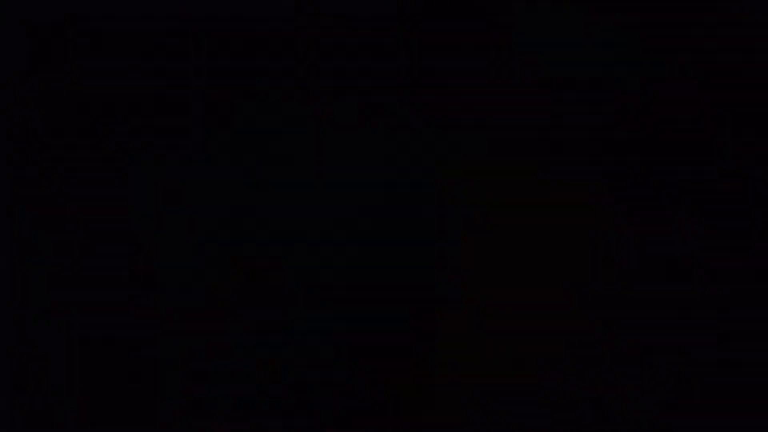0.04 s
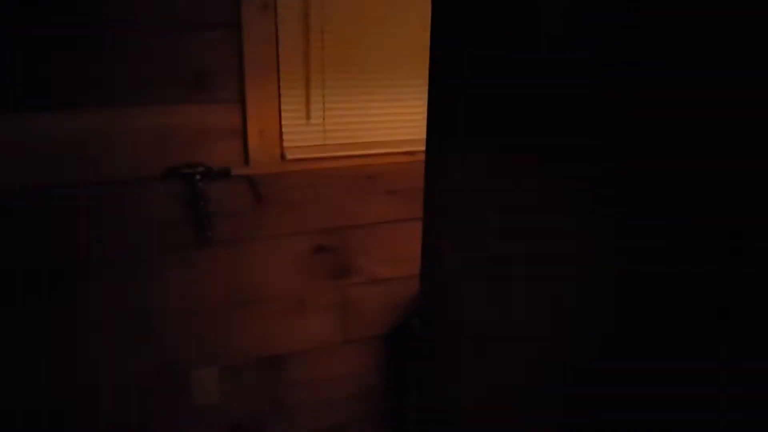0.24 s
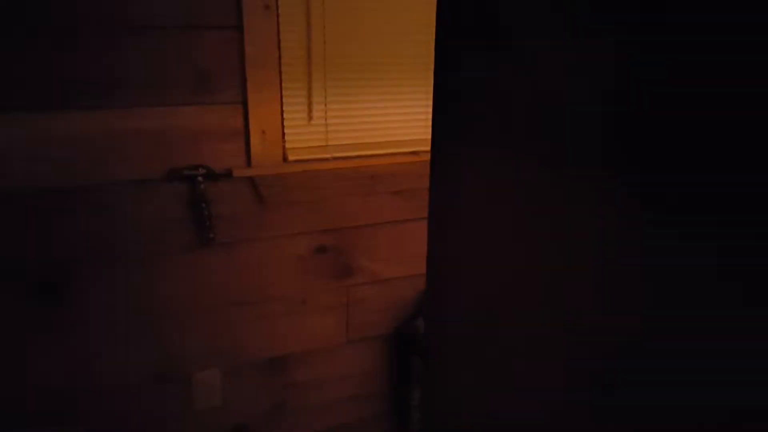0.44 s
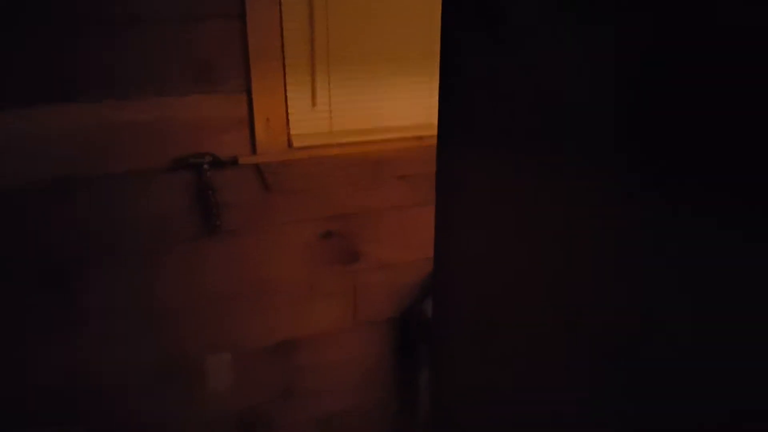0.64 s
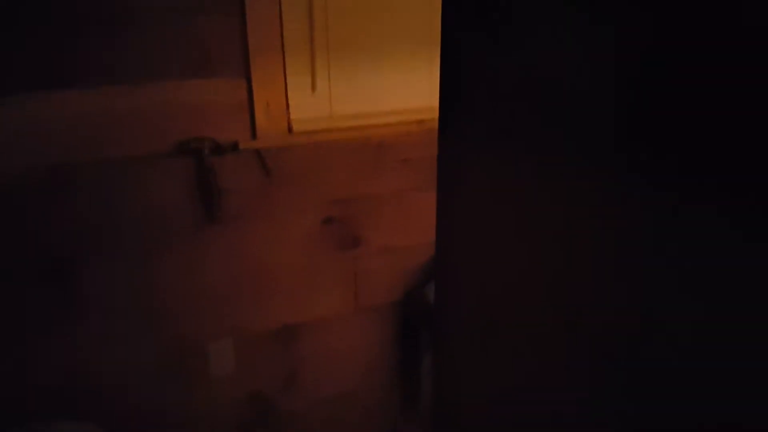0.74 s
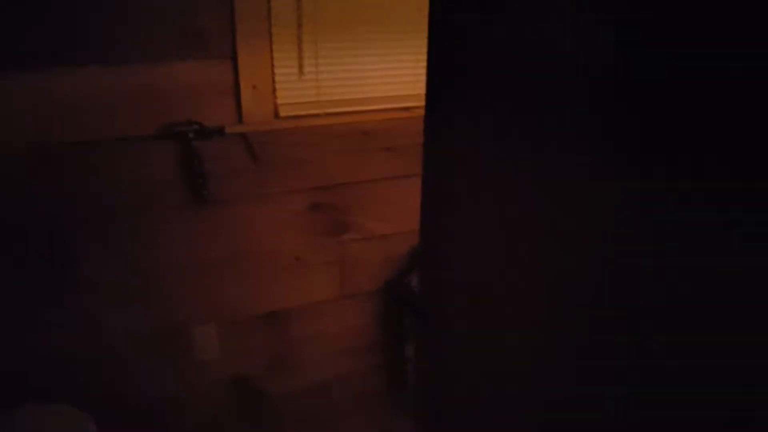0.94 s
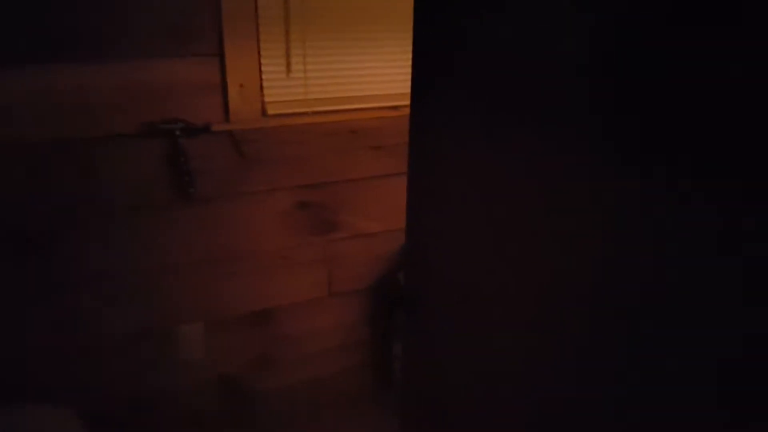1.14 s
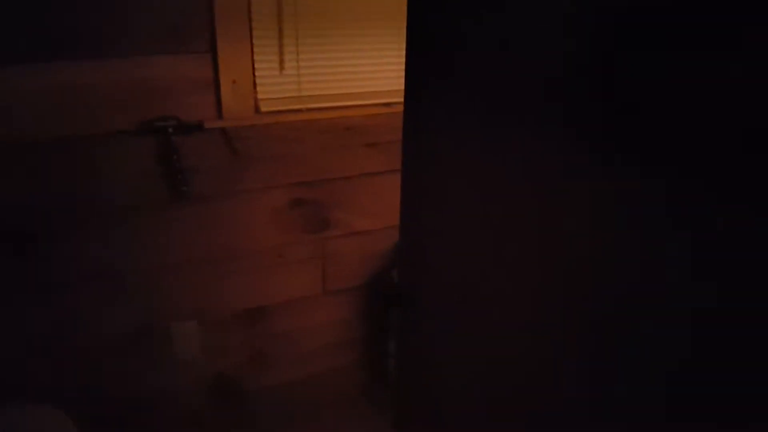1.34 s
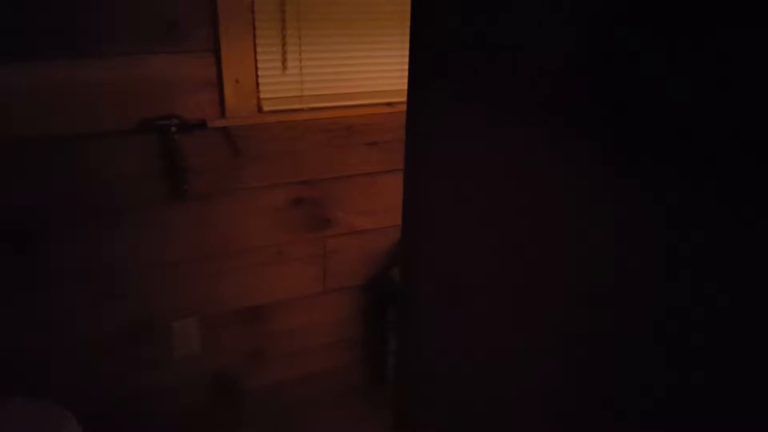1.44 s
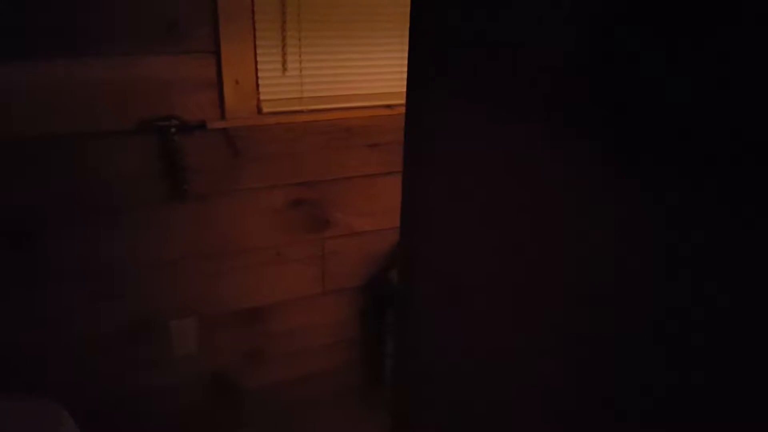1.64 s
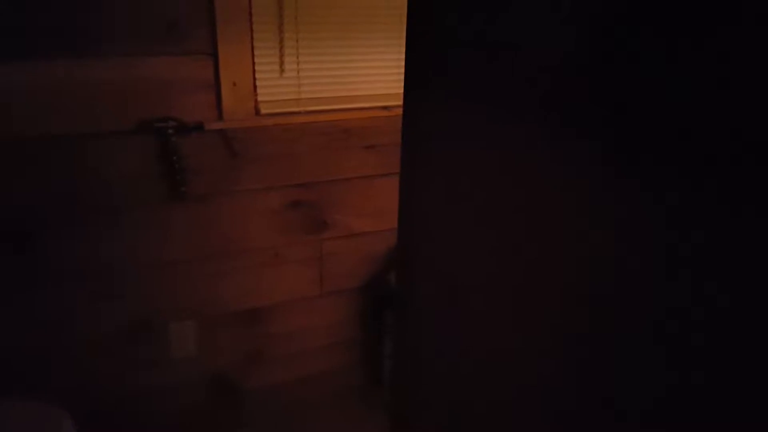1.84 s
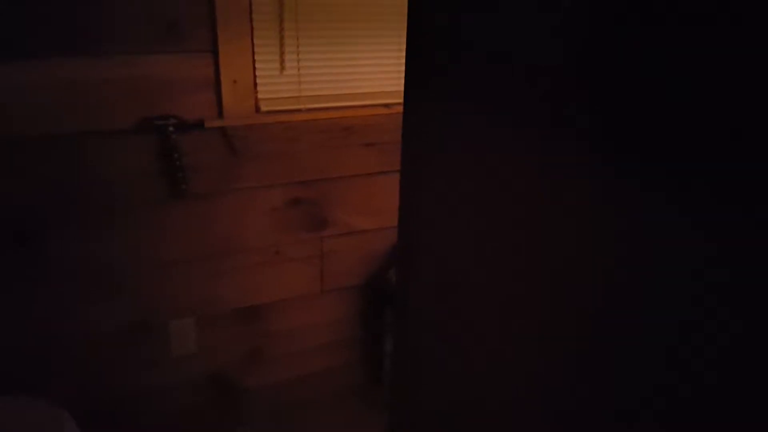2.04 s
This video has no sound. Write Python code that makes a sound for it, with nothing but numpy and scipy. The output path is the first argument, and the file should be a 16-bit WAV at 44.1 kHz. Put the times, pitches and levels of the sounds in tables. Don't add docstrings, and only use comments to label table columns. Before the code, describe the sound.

Four hard shoe steps click and knock on wooden boards, with short room echo and faint hum

```python
import sys
import numpy as np
from scipy import signal
from scipy.fft import rfft, irfft
from scipy.io import wavfile
from scipy.ndimage import uniform_filter1d

SR = 44100
rng = np.random.default_rng(int(sys.argv[2]) if len(sys.argv) > 2 else 0)


def voltage_ratio(level):
    return 10 ** (np.asarray(level, float) / 20)


def materialize(psi):
    bounded = np.clip(np.atleast_2d(psi).T, -1, 1)
    quanta = np.round(bounded * 32767).astype(np.int16)
    wavfile.write(sys.argv[1], SR, quanta)


N = 91331
LENGTH = 1 << 14
T = np.arange(LENGTH) / SR
F = np.fft.rfftfreq(LENGTH, 1 / SR)

# f/Hz, level/dB
HUSH_COLOUR = [(25, -11.5), (70, 0), (200, -2), (650, -16.5), (2000, -21.5), (3700, -29), (4900, -29),
               (8000, -38.5), (15000, -37.5)]
HUSH_SIDE_COLOUR = [(25, -16), (200, -7.5), (600, -10.5), (2000, -15.5), (5000, -23.5), (9500, -32),
                    (15000, -28)]
# t/s, level/dB
STIR = [
    (0, 4.5),
    (.35, -4),
    (.5, -4.5),
    (.72, -1.5),
    (.85, 4.5),
    (1.1, -1.5),
    (1.6, 2),
    (2.07, 1.5),
]
HUSH_DB, HUSH_SIDE_DB, SWELL_TOP_HZ = -62, -69, 930
# t/s, level/dB
HUM_SWELL = [
    (0.0, -91),
    (0.79, -96),
    (0.87, -59.5),
    (1.18, -115),
    (1.34, -53),
    (1.53, -74.5),
    (1.87, -56),
    (2.07, -55),
]
HUM_HZ, HUM_WIDTH_HZ = 116.6, 8.6

# t/s, level/dB, f/Hz, ring/s
TAPS = [(.0185, -43, 780, 0.015), (.0200, -51.5, 350, 0.064), (0.033, -45, 362, 0.044),
        (0.044, -46, 272, 0.069), (0.059, -50, 297, 0.027), (.085, -59, 303, 0.098),
        (.6230, -52, 520, .025), (.6720, -52, 350, .06), (.9194, -45, 330, .05), (.9194, -51, 850, .018),
        (2.034, -58, 228, 0.14), (1.965, -60, 470, 0.092), (1.7076, -62, 247, 0.12),
        (1.7737, -54, 243, 0.036)]
TAP_RISE_S, TAP_WET_DB = 0.00056, -11.5

# f/Hz, t60/s
CABIN_T60 = [(100, 0.36), (250, 0.24), (500, 0.3434), (1100, 0.33), (2000, 0.2539), (3700, 0.2267),
             (7700, 0.23), (15000, 0.1645)]
# f/Hz, level/dB
CABIN_COLOUR = [(100, -4.5), (250, -7.5), (500, -9), (1100, -12), (2000, -13.5), (3700, -16), (7700, -21.5),
                (15000, -19)]
CABIN_RISE_S, CABIN_ALIKE_HZ = 0.00084, 350
EARLY_DB, EARLY_S = -1.5, 0.015
WET_DB = [-3, 0, -0.5, -2, 2.5]
# f/Hz, level/dB
SHADE = [(200, -3), (1000, -2), (2000, -10), (3000, -3.5), (8000, -40), (12000, -25), (15000, -17)]
LEFT_LAG_S = .0003

# t/s, level/dB, plank (rounded), grit length/s, brightness/(dB per octave)
TICKS = [(.1445, -26, 3, 0.0035, 1.5), (.1490, -28.5, 3, 0.0026, -6), (.1540, -31, 2.5, 0.0036, -6.5),
         (.1590, -32, 3, 0.0022, -5), (.1810, -40.5, 2.5, .003, -8), (.2030, -17, 0, .0008, 2.5),
         (.2045, -25, 0.5, 0.00084, -1), (.7370, -38, 4, .0015, 2.5), (.7400, -38.5, 4, 0.0026, -2.5),
         (.7520, -53, 4, 0.0056, -8), (0.765, -46, 4, 0.015, -4), (1.2336, -50, 1.5, .0083, -17),
         (1.3175, -19.5, 1.5, .0024, 5.5), (1.3225, -15.5, 2, 0.0027, 2), (1.3247, -13.5, 1, .0012, -0.5),
         (1.3270, -16.5, 1.5, 0.0027, -5.5), (1.521, -52, 2.5, .0044, -2.5), (1.786, -49.5, 2, .0048, -0.5),
         (1.8222, -9.5, 2, 0.0012, 4), (1.8282, -11, 1.5, 0.0011, -1.5), (1.8300, -14.5, 2, 0.0016, -2.5)]
# f/Hz, level/dB
HEEL_A = [(700, -27), (2100, 13), (2800, 6.5), (4500, -1), (6000, 5), (7200, -5.5), (8400, 1.5),
          (12000, -14.5)]
HEEL_B = [(700, -16), (2600, 9.5), (3500, -4.5), (4300, -4), (6000, 2), (7200, -11), (8600, -5.5),
          (11500, -19)]
HEEL_C = [(1200, -4.5), (2500, 2.5), (3600, 1), (4400, 0), (5900, 4.5), (7100, -4), (8400, 2.5),
          (10500, -15.5)]
HEEL_D = [(900, -6), (2700, 8), (3450, -11), (4400, 7.5), (5700, -0.5), (7000, -7), (8400, -3),
          (12000, -24.5)]
HEEL_E = [(600, 2), (1600, 6.5), (2700, 6.5), (3700, -8), (6200, -4), (7200, -10), (8500, -6), (11000, -22)]
HEELS = (HEEL_A, HEEL_B, HEEL_C, HEEL_D, HEEL_E)
TAIL_EVENING = 0.55

# t/s, level/dB, plank (rounded), hardness f/Hz, joist level/dB
BLOWS = [(0.146, -32, 4, 3370, -58), (0.2026, -17, 0, 2900, -38.5), (.236, -32.5, 0, 690, -69),
         (.7632, -35.5, 3, 4500, -54), (0.7666, -37, 3, 4000, -67), (.7685, -38.5, 3, 1780, -70),
         (.7815, -41, 3.5, 2200, -70), (.7905, -46, 3, 2200, -70), (.837, -50.5, 3.5, 1990, -73),
         (1.318, -35, 2.5, 3120, -32.5), (1.3242, -16, 1, 3480, -43), (1.3300, -25, 1.5, 2780, -60),
         (1.3900, -41.5, 1, 442, -50), (1.8240, -23, 2, 3430, -48), (1.8288, -19.5, 2, 4200, -30.5),
         (1.8447, -27.5, 2.5, 2030, -60)]
# f/Hz, level/dB
CRACK_A = [(120, -20), (220, -2), (450, -13), (800, 0.5), (1300, -20.5), (2100, -1.5), (2700, -14),
           (5500, -22)]
CRACK_B = [(120, -13.5), (400, -6), (850, 0), (1200, -1), (1550, -6), (2250, 1), (2900, -7), (3500, -12.5)]
CRACK_C = [(120, -6), (250, -11), (730, 1.5), (1200, 1), (1700, 5), (2400, -3.5), (3600, -2.5),
           (6000, -22.5)]
CRACK_D = [(120, -5), (280, -8), (600, 1), (800, 1), (1100, -1), (1700, 2), (3000, -14), (5000, -22.5)]
CRACK_E = [(120, -14), (400, -15), (800, -15), (1400, -2.5), (2000, -0.5), (2700, 0.5), (3300, -18),
           (5000, -20)]
CRACKS = (CRACK_A, CRACK_B, CRACK_C, CRACK_D, CRACK_E)
CRACK_DB, CRACK_S, CRACK_LOW_HZ, SPLINTER = 3, 0.0027, 185, 0.36
# f/Hz, level/dB, t60/s
PLANK_A = [(186, -1.5, 0.3), (230.8, 2.5, 0.27), (269.7, 2.5, 0.36), (407, -6, 0.34), (508, -14, 0.45),
           (657, 0.5, 0.22), (755, 5.5, 0.2), (851.4, 6.5, 0.13), (1003, -8.5, 0.33), (2070, -4, 0.3),
           (2200, 19, 0.046), (2300, -16, .2), (3095, -7, .18)]
PLANK_B = [(154, -5, 0.22), (200.6, -3.5, 0.19), (251.5, -2, 0.26), (333.6, -10.5, 0.34), (374, -5.5, 0.31),
           (421, -6, 0.41), (472, -7, .37), (626.3, 6, 0.16), (850, 6, 0.052), (953, -19, 0.11),
           (1190, 6, 0.062), (1252, -1, 0.08), (2196, -4.5, 0.089)]
PLANK_C = [(181, 4, 0.2), (229, 0, .17), (284.1, 0.5, .18), (470, 3.5, 0.17), (737, -5, 0.36),
           (1074, -1, 0.17), (1202, 9, .1), (1270, -5, 0.2), (1590, 2, .15), (1698, 0, 0.15),
           (1838, 4, 0.13), (2219, -0.5, 0.15), (2392, -4, 0.2), (3500, -10, .08)]
PLANK_D = [(197.5, 6.5, 0.156), (276.4, 7.5, 0.16), (381, -1, 0.23), (411, 1.5, .15), (562, -6, .1),
           (633, 12, 0.14), (952, 4.5, .06), (1016, -4, 0.064), (1610, 5, 0.045), (2200, 5, .06)]
PLANK_E = [(201, 2.5, 0.18), (445, 1, 0.24), (540, -3, .18), (677, -11, 0.14), (940, -8, .1),
           (1230, 2, 0.099), (1360, -4, .12), (1970, 6, .16), (2084, 4, .12), (2592, 5, .1)]
PLANKS = (PLANK_A, PLANK_B, PLANK_C, PLANK_D, PLANK_E)
RING_SHARE, RING_TOP_S, RING_RISE_CYCLES, RING_WET_DB = 0.87, .4, 0.86, -4
# f/Hz, level/dB, t60/s
JOISTS = [
    (43, -10, 0.28),
    (66.4, -10.5, 0.44),
    (115.5, -22, 0.54),
]
JOIST_RISE_S = 0.03

TOP_HZ, OFFSET = 15900, -.0005


def read(table, hz):
    table = np.array(table, float)
    return np.interp(np.log(np.maximum(hz, 1)), np.log(table[:, 0]), table[:, 1])


def fall(t60):
    return np.exp(-np.log(1000) * T / max(t60, 1e-4))


def unit(x):
    return x / np.abs(x).max()


def causal(db):
    cepstrum = irfft(db * np.log(10) / 20)
    cepstrum[1:LENGTH // 2] *= 2
    cepstrum[LENGTH // 2:] = 0
    return np.exp(rfft(cepstrum))


def hush(colour, db):
    f = np.fft.rfftfreq(N, 1 / SR)
    noise = rfft(rng.standard_normal(N))
    stir = np.interp(np.arange(N) / SR, *np.array(STIR).T)
    out = 0
    for hz in 20 * 2. ** np.arange(11):
        octave = np.cos(np.pi / 2 * np.clip(np.log2(np.maximum(f, 1) / hz), -1, 1)) ** 2
        swell = voltage_ratio(stir / (1 + hz / SWELL_TOP_HZ))
        out = out + swell * irfft(noise * octave * voltage_ratio(read(colour, f)), N)
    return voltage_ratio(db) * out / out.std()


def hum():
    t = np.arange(N) / SR
    drift = np.cumsum(rng.standard_normal(N)) * np.sqrt(2 * np.pi * HUM_WIDTH_HZ / SR)
    level = voltage_ratio(np.interp(t, *np.array(HUM_SWELL).T))
    return level * np.sqrt(2) * np.sin(2 * np.pi * HUM_HZ * t + uniform_filter1d(drift, size=800))


def tap(db, hz, ring_s):
    rise = 1 - np.exp(-T / TAP_RISE_S)
    return voltage_ratio(db) * unit(np.sin(2 * np.pi * hz * T) * fall(ring_s) * rise)


def cabin():
    noise = rfft(rng.standard_normal((2, LENGTH)))
    alike = 1 / (1 + (F / CABIN_ALIKE_HZ) ** 2)
    mid = noise[0] * np.sqrt(1 + alike)
    side = noise[1] * np.sqrt(1 - alike)
    ports = np.array([mid + side, mid - side])
    out = 0
    for hz in 30 * 2 ** np.arange(0, 9.5, .5):
        band = np.cos(np.pi * np.clip(np.log2(np.maximum(F, 1) / hz), -.5, .5)) ** 2
        decay = fall(read(CABIN_T60, hz))
        out = out + voltage_ratio(read(CABIN_COLOUR, hz)) * decay * irfft(band * ports)
    rise = 1 - np.exp(-T / CABIN_RISE_S)
    early = 1 + voltage_ratio(EARLY_DB) * np.exp(-T / EARLY_S)
    return rfft(out * rise * early / 14)


def add(out, at_s, sound, tail):
    lead = 64
    left = voltage_ratio(read(SHADE, F)) * np.exp(-2j * np.pi * F * LEFT_LAG_S)
    direct = np.array([left, left * 0 + 1])
    heard = irfft(rfft(sound) * (direct + tail) * np.exp(-2j * np.pi * F * lead / SR))
    i = int(at_s * SR) - lead
    out[:, i:i + LENGTH] += heard[:, :N - i]


def burst(grit):
    spectrum = rfft(grit)
    return spectrum * causal(-20 * np.log10(uniform_filter1d(np.abs(spectrum), size=125)))


def tick(db, heel, grit_s, bright_db):
    grit = rng.standard_normal(LENGTH) * rng.random(LENGTH) * np.exp(-T / grit_s)
    tilt = bright_db * np.log2(np.clip(F, 900, 15000) / 5000)
    low_cut = 40 * np.log10(1 + 500 / (F + 1))
    return voltage_ratio(db) * unit(irfft(burst(grit) * causal(read(heel, F) + tilt - low_cut)))


def evened(heel):
    hz, db = np.array(heel).T
    blur = uniform_filter1d(db * 1., size=3) - db
    return causal(TAIL_EVENING * read(np.array([hz, blur]).T, F))


def ring(modes, hard_hz, share, top_s):
    sign = rng.choice([-1., 1.], len(modes))
    out = 0
    for s, (hz, db, t60) in zip(sign, modes):
        level = s * voltage_ratio(db) / (1 + (hz / hard_hz) ** 4)
        rise = 1 - np.exp(-T * hz / RING_RISE_CYCLES)
        out = out + level * np.sin(2 * np.pi * hz * T) * fall(min(t60 * share, top_s)) * rise
    return out


def blow(db, modes, colour, hard_hz, joist_db):
    push = SPLINTER * rng.standard_normal(LENGTH) * np.exp(-T / CRACK_S)
    push[0] = 1
    low_cut = 10 * np.log10(1 + (CRACK_LOW_HZ / (F + 1)) ** 6)
    softness = 10 * np.log10(1 + (F / hard_hz) ** 8)
    crack = irfft(burst(push) * causal(np.maximum(read(colour, F) - low_cut - softness, -90)))
    plank = unit(ring(modes, hard_hz, RING_SHARE, RING_TOP_S))
    joists = ring(JOISTS, 1e4, 0.97, 1) * (1 - np.exp(-T / JOIST_RISE_S))
    return voltage_ratio(db + CRACK_DB) * unit(crack), voltage_ratio(db - 7) * plank, voltage_ratio(joist_db) * joists


def scene():
    side = hush(HUSH_SIDE_COLOUR, HUSH_SIDE_DB)
    out = hush(HUSH_COLOUR, HUSH_DB) + hum() + np.array([side, -side])
    tails = [voltage_ratio(db) * cabin() for db in WET_DB]
    heel_tails = [tail * evened(heel) for tail, heel in zip(tails, HEELS)]
    for at_s, db, hz, ring_s in TAPS:
        add(out, at_s, tap(db, hz, ring_s), voltage_ratio(TAP_WET_DB) * tails[3])
    for at_s, db, spot, grit_s, bright_db in TICKS:
        spot = round(spot)
        add(out, at_s, tick(db, HEELS[spot], grit_s, bright_db), heel_tails[spot])
    for at_s, db, spot, hard_hz, joist_db in BLOWS:
        spot = round(spot)
        crack, plank, joists = blow(db, PLANKS[spot], CRACKS[spot], hard_hz, joist_db)
        add(out, at_s, crack, tails[spot])
        add(out, at_s, plank, voltage_ratio(RING_WET_DB) * tails[spot])
        add(out, at_s, joists, 0)
    return out


def band_limit(x):
    return signal.sosfilt(signal.butter(12, 16650, fs=SR, output="sos"), x)


def record(dry):
    low_pass = signal.ellip(8, .3, 50, TOP_HZ, fs=SR, output="sos")
    mix = signal.sosfilt(low_pass, dry) + OFFSET
    return band_limit(mix)


dry = scene()
out = record(dry)
materialize(out)
```